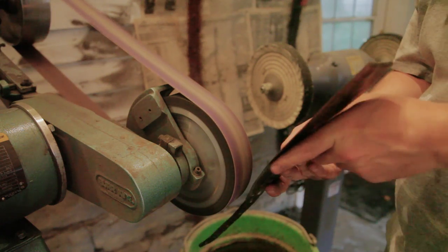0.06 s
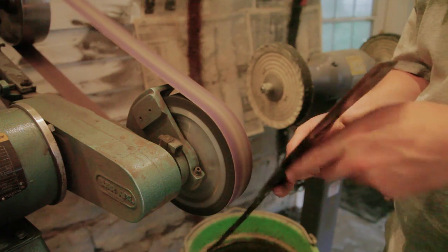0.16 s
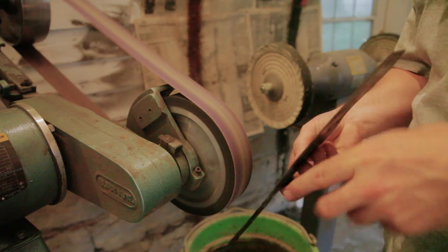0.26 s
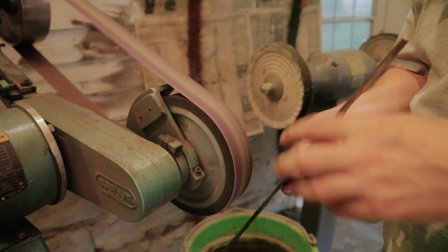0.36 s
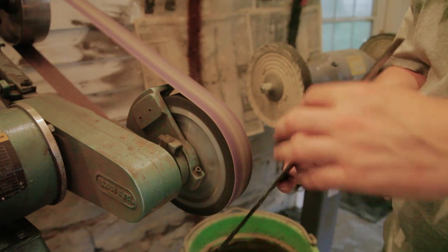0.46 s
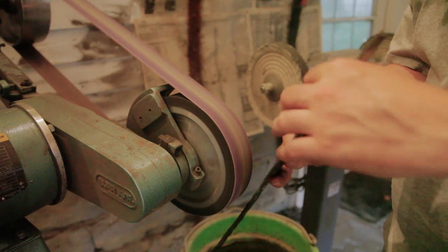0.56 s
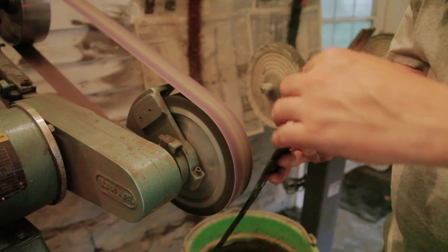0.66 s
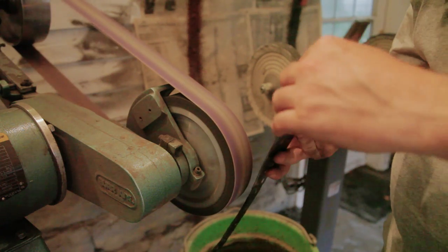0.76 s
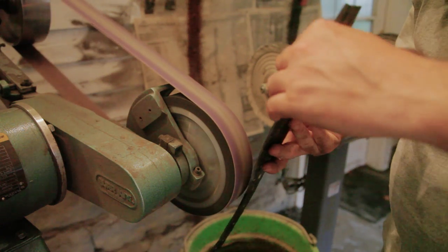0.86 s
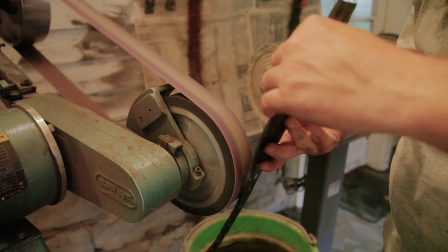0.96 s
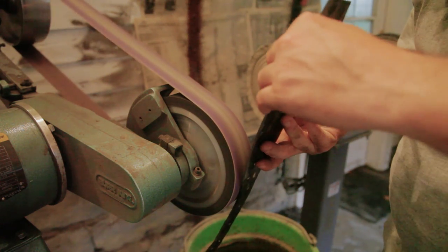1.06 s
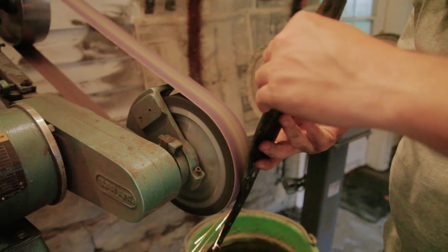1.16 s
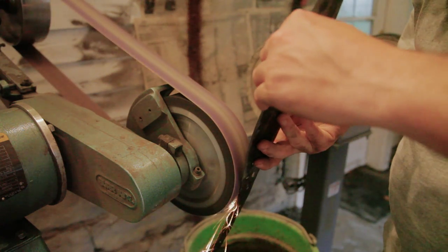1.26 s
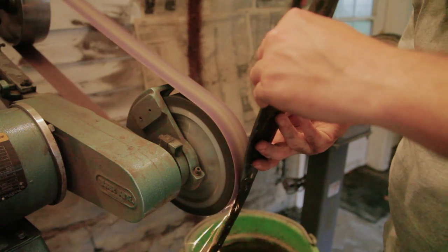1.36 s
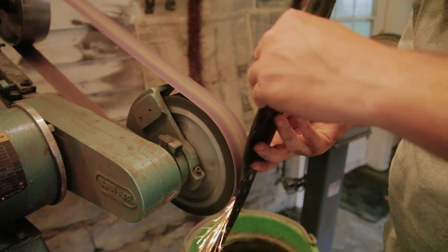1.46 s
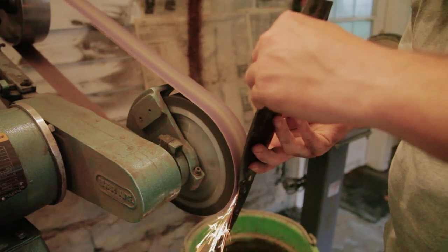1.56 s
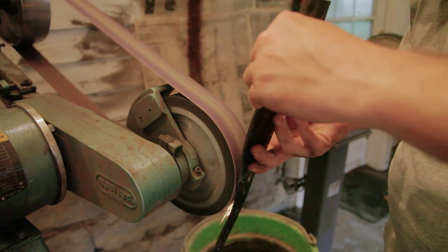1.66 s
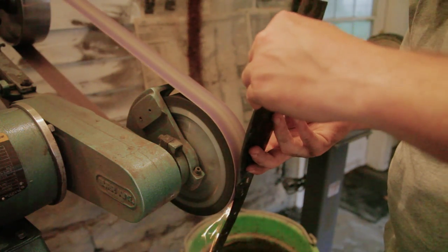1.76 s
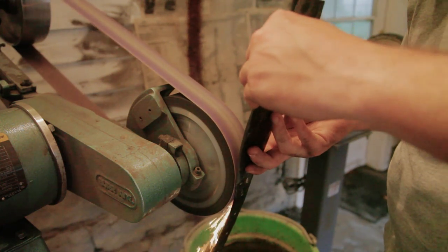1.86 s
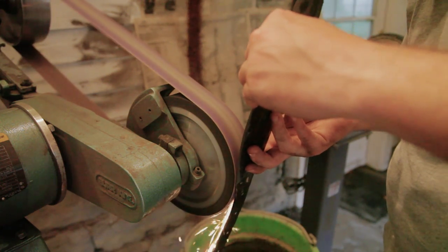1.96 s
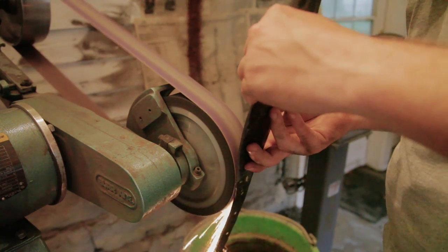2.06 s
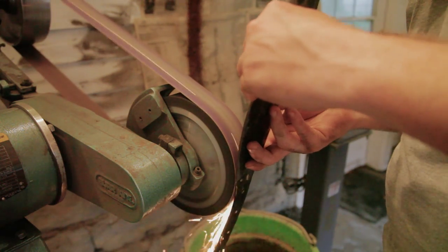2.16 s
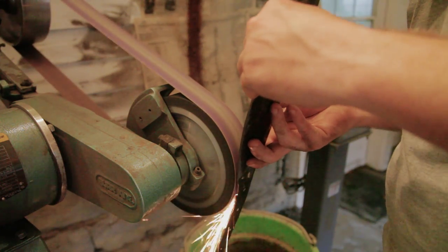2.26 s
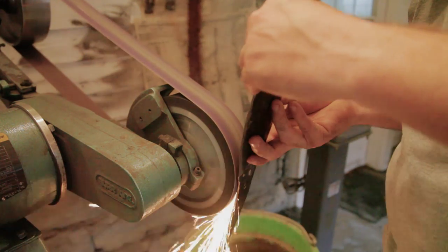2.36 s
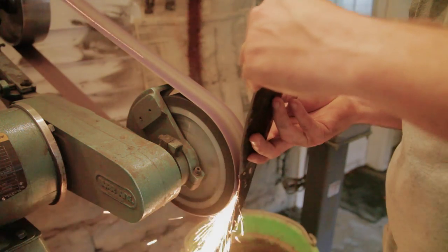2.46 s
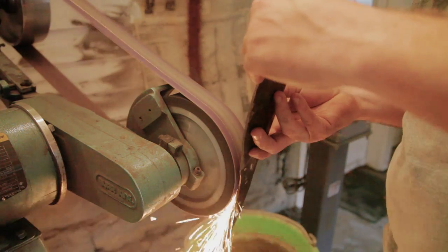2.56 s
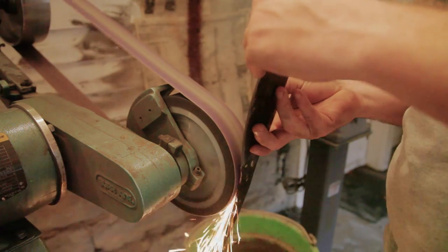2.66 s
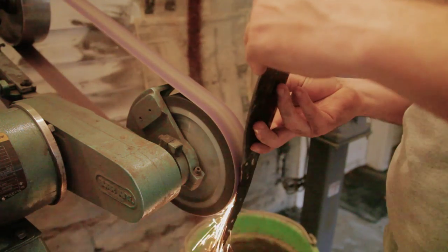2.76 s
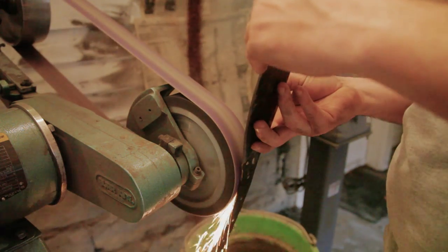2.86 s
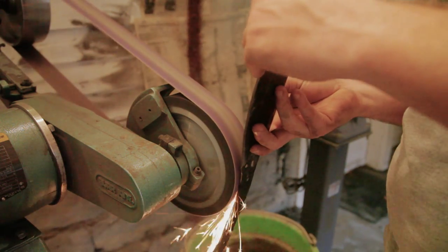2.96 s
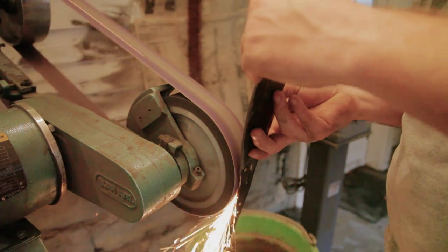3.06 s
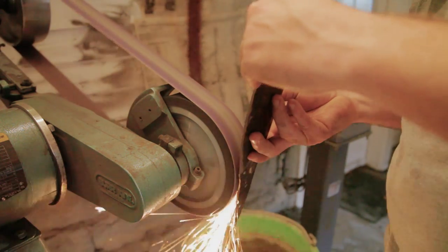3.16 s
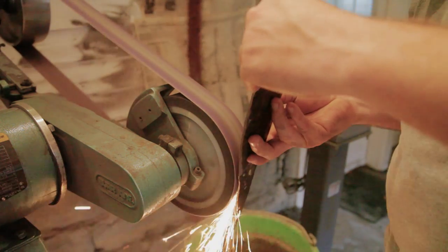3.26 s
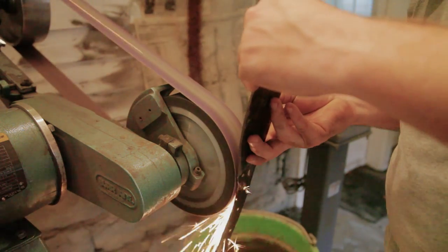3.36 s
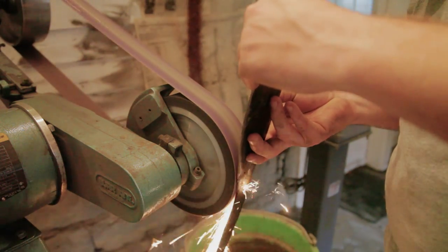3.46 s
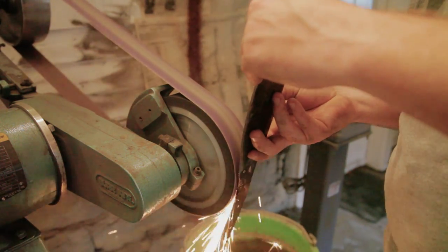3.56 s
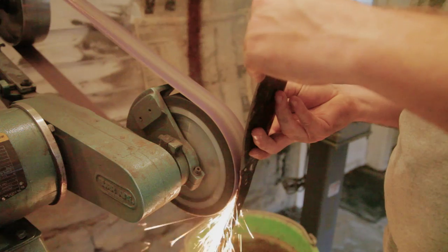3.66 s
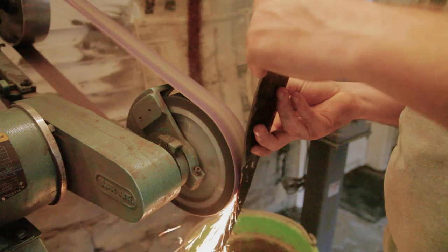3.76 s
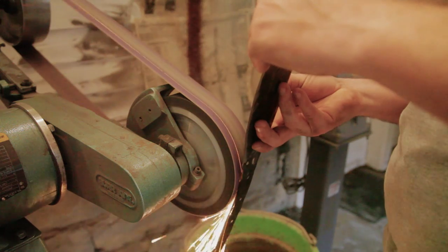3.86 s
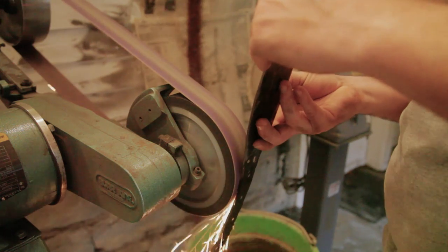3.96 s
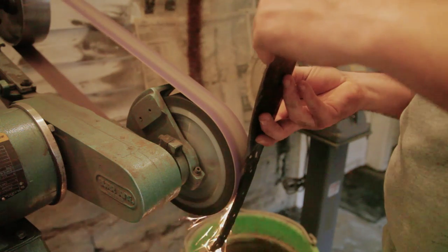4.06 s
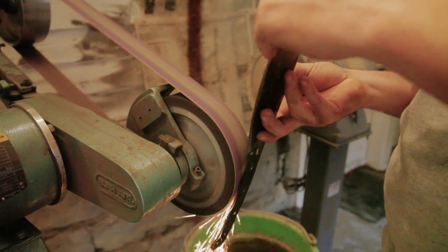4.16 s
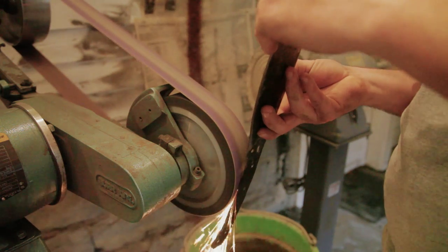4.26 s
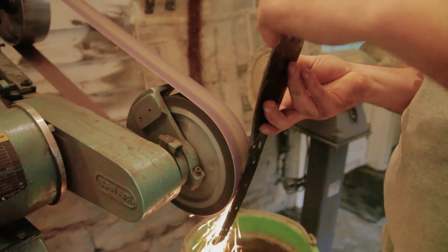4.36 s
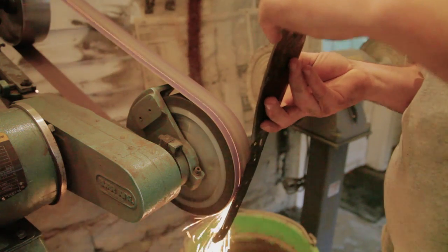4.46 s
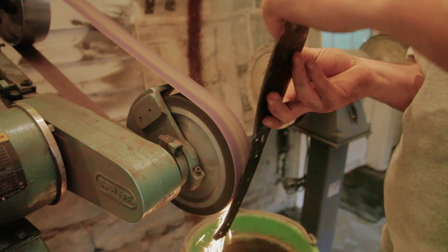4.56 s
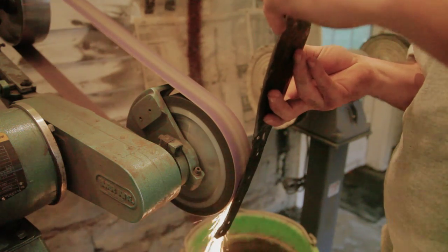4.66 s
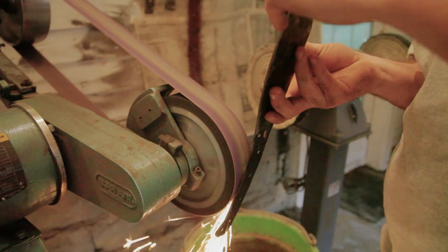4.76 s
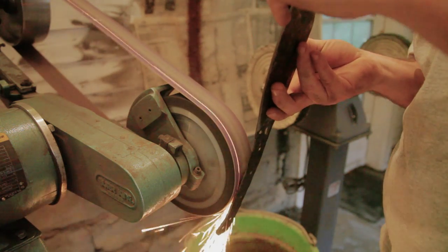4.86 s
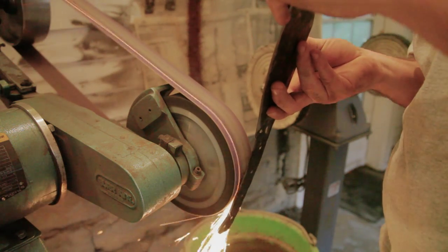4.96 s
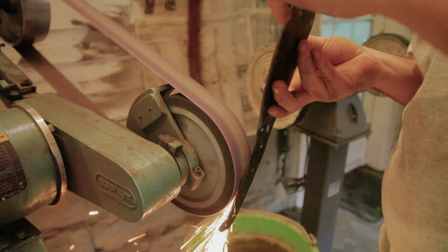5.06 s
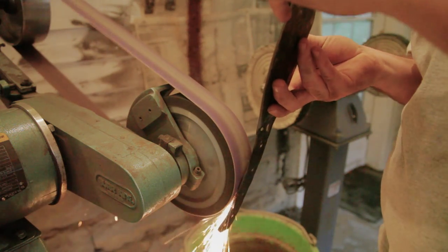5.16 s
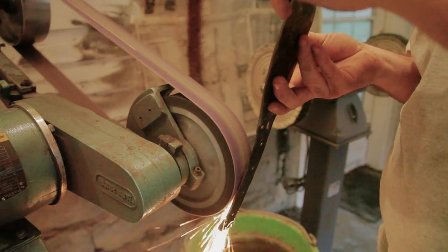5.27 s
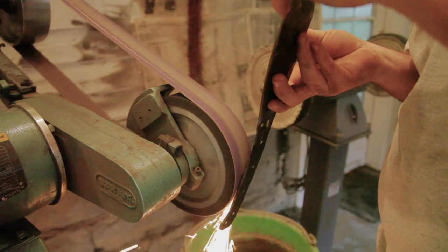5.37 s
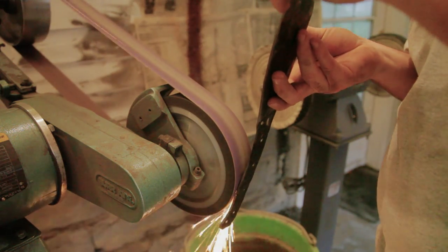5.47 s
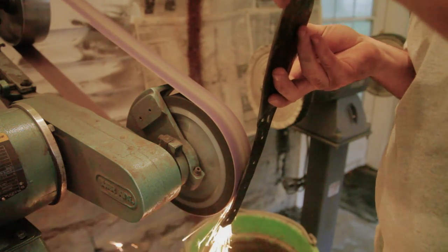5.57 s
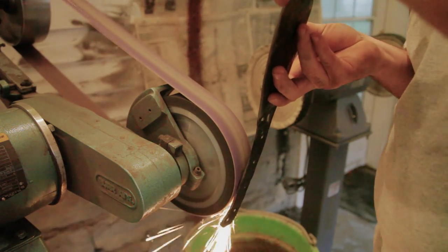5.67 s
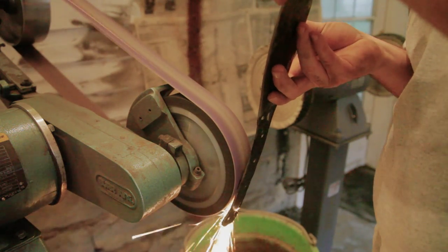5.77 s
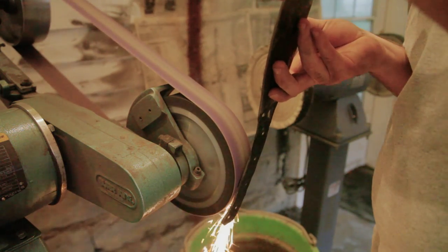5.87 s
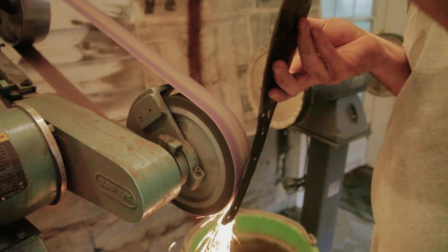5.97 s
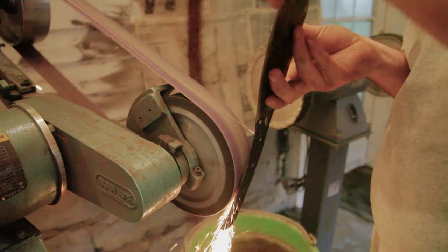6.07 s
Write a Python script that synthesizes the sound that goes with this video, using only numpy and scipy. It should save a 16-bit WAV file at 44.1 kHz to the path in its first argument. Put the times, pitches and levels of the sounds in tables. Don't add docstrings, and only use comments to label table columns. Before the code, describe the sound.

A belt grinder hums and hisses with a rapid tick, then a steel blade chatters onto the belt and grinds in a bright, ringing, sizzling hiss.

```python
import sys
import numpy as np
from scipy import signal
from scipy.fft import rfft, irfft
from scipy.io import wavfile
from scipy.ndimage import uniform_filter1d

SR = 44100
rng = np.random.default_rng(int(sys.argv[2]) if len(sys.argv) > 2 else 0)


def to_wav(sig):
    pcm = np.clip(np.atleast_2d(sig), -1, 1) * 32767
    pcm = np.round(pcm).astype(np.int16)
    wavfile.write(sys.argv[1], SR, pcm.T)


def rack_gain(trim_db):
    fader = np.asarray(trim_db, float)
    return 10 ** (fader / 20)


N = 270288
T = np.arange(N) / SR


def rms_one(x):
    return x / np.sqrt(np.mean(x ** 2) + 1e-20)


def in_time(rows):
    s, *columns = np.transpose(rows)
    return [np.interp(T, s, c) for c in columns]


def colour(x, points):
    hz, level_db = np.transpose(points)
    bins = np.log(np.arange(1, N // 2 + 2) * SR / N)
    gain_db = np.interp(bins, np.log(hz), level_db)
    return rms_one(irfft(rfft(x) * rack_gain(gain_db), N))


def drift(rate):
    r = np.exp(-80 * np.pi * rate / SR)
    noise = rng.standard_normal(N // 40 + 2002)
    slow = signal.lfilter([1], [1, -2 * r, r * r], noise)[2000:]
    return np.interp(np.arange(N) / 40, np.arange(len(slow)), rms_one(slow))


def resonance(x, hz, width):
    r = np.exp(-np.pi * width / SR)
    poles = [1, -2 * r * np.cos(2 * np.pi * hz / SR), r * r]
    return signal.lfilter([(1 - r * r) / 2, 0, (r * r - 1) / 2], poles, x)


def grit(per_s, spread_db):
    sizes = rack_gain(spread_db * np.minimum(rng.exponential(1, N), 5)) * rng.standard_normal(N)
    return rms_one(sizes * (rng.random(N) < per_s / SR))


# (time [s], place along the blade [0-1])
PLACE = [(1.5, 0.07), (2.02, 0.087), (2.25, 0.17), (2.84, 0.54), (3.33, 0.2), (3.62, 0.36), (4.0, 0.48),
         (4.62, 0.71), (5.15, 0.83), (5.42, 0.84), (5.64, 0.92), (6.13, 0.98)]


def blade(loops, lumps):
    force = contact()
    place, = in_time(PLACE)
    wheel_db = 0.9 * np.sin(2 * np.pi * 2.94 * loops)
    flutter = rack_gain(0.7 * lumps + wheel_db + .5 * drift(32) + 0.092 * drift(8.7))
    ringing = blade_modes(force, place, flutter * grit(30000, 1.5))
    chips = flutter * grit(30000, 1.5)
    return rack_gain(6.5) * ringing + grit_hiss(force, place, chips) + spark_sizzle(force, place, chips)


BLADE_HZ = [1945, 2030, 2390, 2585, 2920, 3210, 3555, 3840, 4170, 4505, 4670, 5125, 5435, 5820, 6190, 6520,
            7030, 7535, 7910, 8465, 8890, 9500, 9950, 10500, 11100, 11600, 12050, 12600, 13500, 14100]
# (level [dB], antinodes along the stroke, shift [0-1], tilt along the stroke [dB])
MODE_SHAPES = [(8.5, 0.343, 0.24, 17), (0.5, 0.53, 1, -5.5), (0, 1.07, 0.56, 17), (4.5, 0.75, 0.85, 18),
               (-3.5, 1.8, 0.76, 26), (-4.5, 2.83, 0.7, -13), (12, 0.36, 0.4, 6), (19, 0.22, 0.31, 3.5),
               (4, 2.52, 1, 15), (6, 1.72, 0.5, -6), (-1, 0.34, 0.89, 4), (0, 1.56, 0.54, 8),
               (5, 1.65, 0.19, -17), (2.5, 3.6, 0.73, 10), (12.5, 0.23, 0.27, 5), (3.5, 3.6, 0.76, 10.5),
               (1.5, 2.65, 0.23, -33), (5, 4.5, 0, 11), (2, 2.94, 0.85, 5), (3.5, 4.26, 0.52, 12),
               (2.5, 1.95, 0.54, -18), (0.5, 0.84, 0.78, -5), (3, 4.48, 0.43, 17), (2, 0.37, 0.82, 9),
               (9, 0.65, 0.29, -8), (13, 0.53, 0.39, -13), (-3, 0.27, 0.62, -1), (4, 2.3, 0.7, -14),
               (-9, 0.48, 0.75, -4), (1, 0.07, 0.3, -7)]
# (pitch [Hz], width [Hz], level [dB])
FREE_RING = [(2015, 32, -2), (2580, 33, -6), (3830, 52, -2), (4180, 45, -7), (4485, 44, 1), (6190, 37, -8),
             (6530, 38, -9), (7050, 43, -8), (8900, 51, -10), (9940, 60, -13), (11700, 100, -15),
             (12600, 140, -12)]
# (pitch [Hz], width [Hz], level [dB])
FIRM_MODES = [(2593, 33, 5.5), (3880, 16, -12), (3920, 17, 16), (3980, 22, 16), (4350, 16, 6),
              (4330, 32, 5), (4500, 36, 6), (4656, 28, 4)]
FREE_DAMPING = .55
MODE_WIDTH_HZ, WIDTH_PER_KHZ = 28, 8.0


def blade_modes(force, place, scratch):
    body, edge, sizzle, bouncing = force
    ringing, firm = np.zeros(N), firmness()
    for hz, width, db in FREE_RING:
        ringing += rack_gain(db + 17.0) * resonance(bouncing * scratch, hz, FREE_DAMPING * width)
    for hz, width, db in FIRM_MODES:
        ringing += rack_gain(db - 3.5) * resonance(firm * body * scratch, hz, width)
    for hz, (db, antinodes, shift, tilt_db) in zip(BLADE_HZ, MODE_SHAPES):
        width = MODE_WIDTH_HZ + WIDTH_PER_KHZ * hz / 1000
        if hz < 7500:
            push = rack_gain(1.5) * (body - .6 * bouncing)
        elif hz < 11000:
            push = edge
        else:
            push = rack_gain(-2.5) * sizzle
        swing = .1 + np.cos(np.pi * (antinodes * place + shift)) ** 2
        shape = swing * rack_gain(db + tilt_db * (place - .5))
        drive = shape * rack_gain(1.5 * drift(9)) * push * scratch
        trade = rack_gain(2 * drift(3))
        ringing += resonance(drive * trade, hz - .4 * width, .8 * width)
        ringing -= resonance(drive / trade, hz + .4 * width, .8 * width)
    return ringing


# (pitch [Hz], level [dB per Hz])
BODY_COLOUR = [(300, -17.5), (700, -7), (1200, -2), (1800, -7), (2600, -1.5), (3300, -1.5), (4300, 6),
               (5500, 2.5), (7000, 2.5), (8000, -12), (10000, -47)]
# (pitch [Hz], level [dB per Hz])
EDGE_COLOUR = [(5500, -49), (7000, -0.5), (8000, -2.5), (9500, 4), (10500, 0), (11500, 7), (14000, -34)]
BODY_SPLIT_HZ, BODY_DULLS_DB, BODY_DULL_AT, BODY_DULL_SPAN = 5000, -7, 0.79, 0.07


def grit_hiss(force, place, chips):
    body, edge, _, _ = force
    rasp = colour(chips, BODY_COLOUR)
    bright = signal.sosfiltfilt(signal.butter(2, BODY_SPLIT_HZ, "high", fs=SR, output="sos"), rasp)
    dull_db = BODY_DULLS_DB * np.exp(-((place - BODY_DULL_AT) / BODY_DULL_SPAN) ** 2)
    rasp += bright * (rack_gain(dull_db) - 1)
    return rack_gain(-7.0) * body * rasp + rack_gain(-5.0) * edge * colour(chips, EDGE_COLOUR)


# (pitch [Hz], level [dB per Hz])
SIZZLE_COLOUR = [(7500, -40), (10000, -12), (11300, -1), (12800, 0), (14000, -1), (16000, -2), (20000, -2)]
LEAN_DB, LEAN_PER_FLARE, LEAN_TILT_DB = 1.3, -0.2, -4.5


def spark_sizzle(force, place, chips):
    sizzle = force[2]
    sparks = colour(chips, SIZZLE_COLOUR)
    upper = signal.sosfilt(signal.butter(3, 13300, "high", fs=SR, output="sos"), sparks)
    lower = signal.sosfilt(signal.butter(3, 13300, "low", fs=SR, output="sos"), sparks)
    lean = rack_gain(LEAN_DB + LEAN_PER_FLARE * flares() + LEAN_TILT_DB * place)
    return rack_gain(1.5) * sizzle * (upper * lean + lower / lean)


# (time [s], level [dB])
PRESSURE = [(1.7, -23), (2.0, -22), (2.2, -21.5), (2.58, -22.5), (2.8, -20.5), (3.02, -22), (3.46, -27.5),
            (3.79, -23), (3.9, -23), (4.12, -23), (4.34, -23), (4.48, -20), (4.56, -25.5), (4.7, -24),
            (5.15, -21), (5.35, -24.5), (5.68, -22), (6.13, -22)]
# (time [s], sizzle peak [dB], body level [dB])
BOUNCES = [(1.177, -13.5, -12), (1.2683, -13, -17.5), (1.3, -21, -17.5), (1.33, -19, -16.5),
           (1.359, -15, -17), (1.389, -16, -18), (1.417, -17, -15.5), (1.446, -14, -14.5),
           (1.477, -19, -14.5), (1.503, -11, -17), (1.528, -9, -19), (1.553, -10, -18), (1.572, -14, -19),
           (1.59, -12, -13), (1.609, -11.5, -23), (1.626, -10.5, -19.5), (1.646, -13.5, -25),
           (1.663, -12, -19.5), (1.684, -11.5, -21.5), (1.713, -9, -15.5)]
FIRST_TOUCH_S = BOUNCES[0][0]
TOUCH_S, BOUNCE_BODY_DB, BOUNCE_SIZZLE_DB = 0.0077, -2.5, -10
GRAZE_SHARE = 0.21
SETTLE_FROM_S, SETTLE_S = 1.48, 0.28
PRESS_DB = 2.5
SPARK_DB, SPARK_TILT_DB, SPARK_FIRM_DB = -28.5, -4.5, 1
SPARK_DULLS_DB, DULL_FROM_S, DULL_BACK_S = -5, 4.44, 1.2
EDGE_DB, EDGE_FROM_SPARKS, EDGE_FIRM_DB, EDGE_TILT_DB = -1.5, 0.44, 1.5, -3.5


def contact():
    firm, (place,) = firmness(), in_time(PLACE)
    body_db = in_time(PRESSURE)[0] + PRESS_DB * firm
    since_dull = T - DULL_FROM_S
    eased = np.clip(since_dull / 0.21, 0, 1) * np.exp(-np.maximum(since_dull, 0) / DULL_BACK_S)
    sizzle_db = SPARK_DB + 2 + SPARK_TILT_DB * place + SPARK_FIRM_DB * firm
    sizzle_db = sizzle_db + flares() + SPARK_DULLS_DB * eased
    edge_db = EDGE_DB + EDGE_FROM_SPARKS * sizzle_db + (1 - EDGE_FROM_SPARKS) * body_db
    edge_db = edge_db + EDGE_FIRM_DB * firm + EDGE_TILT_DB * place
    settle = np.clip((T - SETTLE_FROM_S) / SETTLE_S, 0, 1) ** 0.89
    body, sizzle = np.zeros(N), np.zeros(N)
    for s, db, low_db in BOUNCES:
        since = T - s
        after = np.maximum(since, 0)
        touch = np.clip(since / .0005, 0, 1) / (1 + (after / TOUCH_S) ** 6)
        touch *= 1 + 0.32 * np.exp(-after / 0.0012)
        share = GRAZE_SHARE if s == FIRST_TOUCH_S else 1
        body += rack_gain(BOUNCE_BODY_DB + low_db) * touch * share
        sizzle += rack_gain(db + BOUNCE_SIZZLE_DB) * touch
    return (np.maximum(settle * rack_gain(body_db - 1.0), body),
            np.maximum(settle * rack_gain(edge_db), rack_gain(-0.5) * sizzle),
            np.maximum(settle * rack_gain(sizzle_db), sizzle),
            (1 - settle) * body)


# (time [s], length [s], firmness [0-1])
PRESSES = [
    (2.233, 0.47, 0.78),
    (2.935, 0.84, 0.92),
    (4.456, 0.046, 0.7),
]
PRESS_EDGE_S, PRESS_SAG_S, PRESS_KEEPS = 0.035, 0.72, 0.94


def firmness():
    out = np.zeros(N)
    for s, length, firm in PRESSES:
        held = np.clip(np.minimum(T - s, s + length - T) / PRESS_EDGE_S + .5, 0, 1)
        sag = np.exp(-np.maximum(T - s, 0) / PRESS_SAG_S)
        out += firm * held * (PRESS_KEEPS + (1 - PRESS_KEEPS) * sag)
    return out


# (time of the crest [s], flare [dB], rise [s])
FLARES = [(1.7, 4, 0.12), (2.13, 4.5, 0.16), (2.6, 6, 0.046), (3.05, 4.5, 0.088), (3.54, 4.5, 0.093),
          (4.06, 6.5, 0.11), (4.49, 4.5, 0.083), (5.63, 3, 0.091), (5.85, 3.5, 0.15), (6.12, 3.5, 0.08)]
FALL_SHARE = 0.99


def flares():
    swell_db = np.zeros(N)
    for s, db, rise in FLARES:
        span = np.where(T < s, rise, FALL_SHARE * rise)
        swell_db += db * np.exp(-((T - s) / span) ** 2)
    return swell_db


# (pitch [Hz], level [dB per Hz])
IDLE_COLOUR = [(260, -51), (450, -24), (571, -6.5), (865, -13), (1160, -7), (2050, -11.5), (2490, -5.5),
               (3200, -3.5), (3770, 0), (5000, 2.5), (7140, -5), (8790, -9), (9760, -13), (15700, -22.5)]
# (pitch [Hz], width [Hz], level [dB])
FRAME = [(573, 4, -4), (1042, 3.7, 10), (1166, 120, 2.5), (1474, 49, 0.5), (1903, 28, -12), (2475, 76, -2),
         (3800, 170, -9), (8630, 410, -0.5)]
IDLE_DB = -21.5


def belt(loops, lumps):
    noise = colour(grit(30000, 1.2), IDLE_COLOUR)
    hiss = noise + sum(rack_gain(db) * resonance(noise, hz, width) for hz, width, db in FRAME)
    hiss = rack_gain(IDLE_DB - 1.0 + 0.95 * lumps + 0.24 * drift(5)) * hiss
    passes = np.flatnonzero(np.diff(np.floor(loops)) > 0)
    snaps = np.zeros(N)
    snaps[passes] = rack_gain(1.5 * rng.standard_normal(len(passes))) * rng.choice([-1, 1], len(passes))
    snap = rack_gain(6) * resonance(resonance(snaps, 4800, 5000), 5500, 7000)
    snap += rack_gain(3) * resonance(resonance(snaps, 8600, 4000), 8000, 5000)
    rattle = noise * signal.lfilter([1], [1, -np.exp(-1 / (0.001 * SR))], np.abs(snaps))
    return hiss + snap + rack_gain(-41) * rattle


# (time [s], speed [loops per s])
BELT_SPEED = [
    (0, 11.56),
    (1.4, 11.56),
    (1.7, 11.513),
    (6.2, 11.513),
]
FIRST_SPLICE_S = .0092


def belt_loops():
    loops = np.cumsum(in_time(BELT_SPEED)[0]) / SR - FIRST_SPLICE_S * BELT_SPEED[0][1]
    lumps = rng.standard_normal(40)
    lumps = rms_one(lumps - lumps.mean())
    return loops, np.interp(loops % 1, np.arange(40) / 40, lumps, period=1)


# (pitch [Hz], level [dB])
TONES = [(32.7, -54), (46, -59), (107.7, -47), (164, -51), (177.3, -45), (189, -51), (210, -42),
         (243.5, -54), (311, -48), (332, -44), (343.5, -40), (355, -36), (566, -51), (737, -56), (995, -49),
         (1180, -51)]
# (pitch [Hz], level [dB per Hz])
RUMBLE_COLOUR = [(15, -30), (28, -36), (65, -25), (130, -17.5), (180, -19), (200, -35), (255, -15.5),
                 (300, -12), (345, 0), (358, -14), (368, -16), (420, -14), (520, -20.5), (700, -41)]
RUMBLE_DB = -35.5


def motor():
    tones = np.zeros(N)
    for hz, db in TONES:
        wobble_db = min(hz / 90, 4) * drift(8)
        tones += rack_gain(db + wobble_db) * np.sqrt(2) * np.sin(2 * np.pi * (hz * T + rng.random()))
    return tones + rack_gain(RUMBLE_DB) * colour(rng.standard_normal(N), RUMBLE_COLOUR)


def workshop(x):
    t = np.arange(int(.4 * SR)) / SR
    tail = rng.standard_normal(len(t)) * rack_gain(-60 * t / .3) * (t > .004)
    tail = signal.lfilter([1], [1, -.25], tail)
    return signal.fftconvolve(x, tail / np.sqrt(np.sum(tail ** 2)))[:N]


IDLE_GAIN_DB, DUCKED_DB, CLOSE_S = 1.03, -8, 0.31
DUCK_SHARE = 0.2
RECOVER_DB_PER_S, RECOVER_FROM_S = 3.5, 4.84


def gain_control():
    closed = np.clip((T - FIRST_TOUCH_S) / (2 * CLOSE_S), 0, 1)
    pressure_db = uniform_filter1d(in_time(PRESSURE)[0] + PRESS_DB * firmness(), size=SR // 8)
    ducked = DUCKED_DB - DUCK_SHARE * (pressure_db - pressure_db.mean())
    ducked = ducked + RECOVER_DB_PER_S * np.maximum(T - RECOVER_FROM_S, 0)
    return IDLE_GAIN_DB - 1.35 * np.minimum(T, FIRST_TOUCH_S) + closed * ducked


def scene():
    loops, lumps = belt_loops()
    steel = blade(loops, lumps)
    machine = rack_gain(gain_control()) * (motor() + belt(loops, lumps))
    mono = machine + steel + rack_gain(-10) * workshop(steel)
    return np.array([mono, mono])


def roll_off(x):
    return signal.sosfilt(signal.butter(12, 16340, fs=SR, output="sos"), x)


def record(dry):
    above_hz = np.maximum(np.arange(N // 2 + 1) * SR / N - 15730, 0)
    spectrum = rfft(dry, axis=1) * rack_gain(-.35 * above_hz)
    mix = irfft(spectrum, N, axis=1)
    return roll_off(mix)


dry = scene()
out = record(dry)
to_wav(out)
```